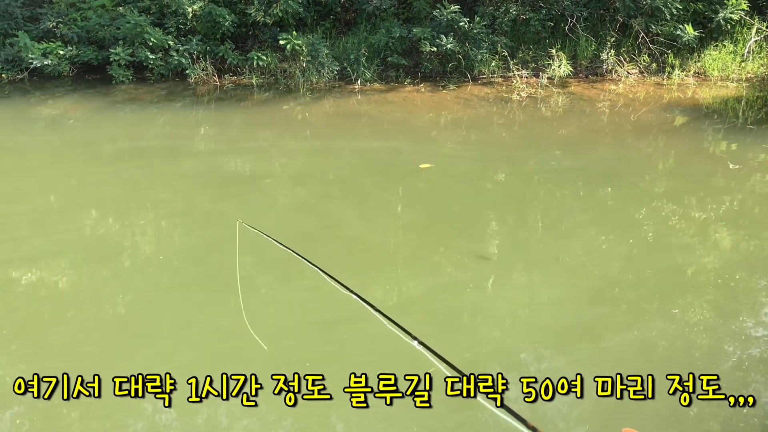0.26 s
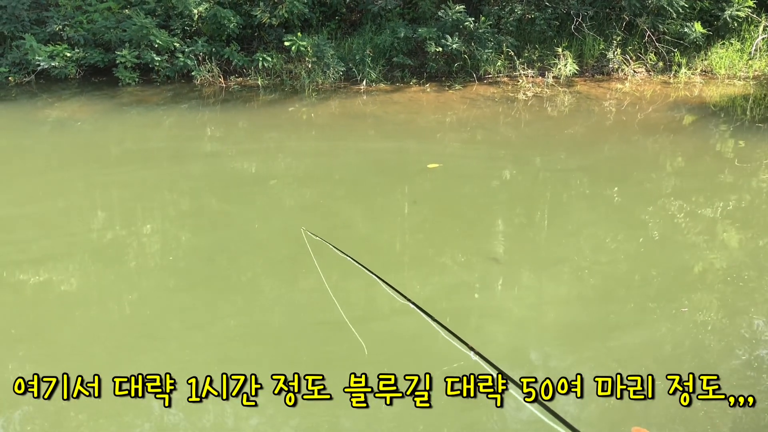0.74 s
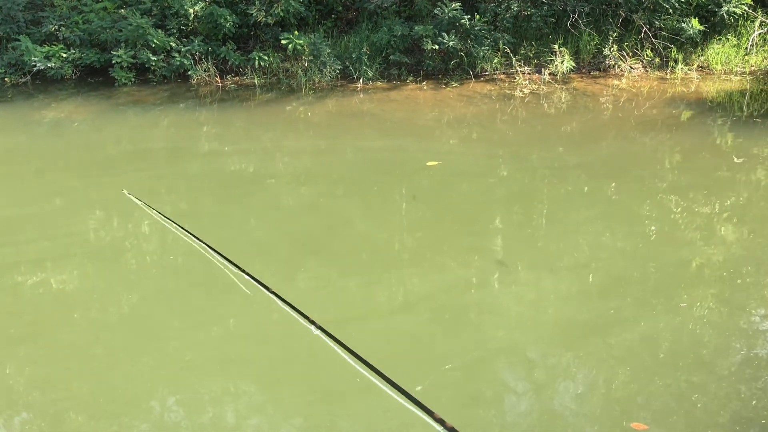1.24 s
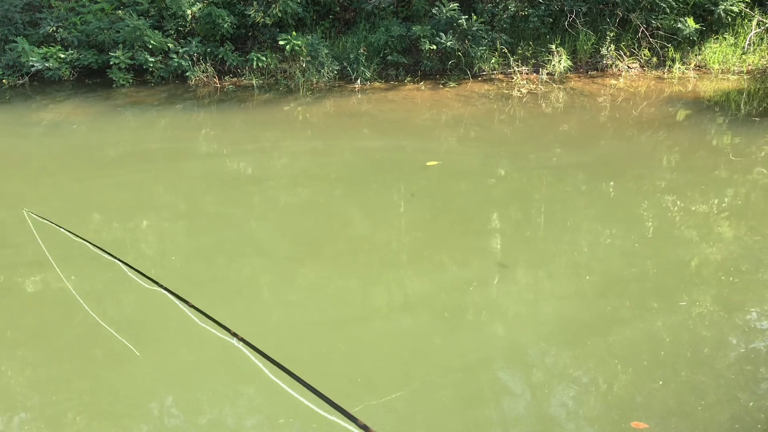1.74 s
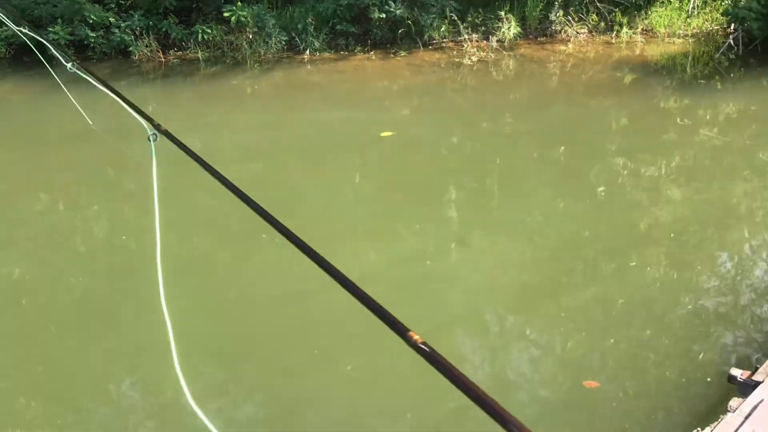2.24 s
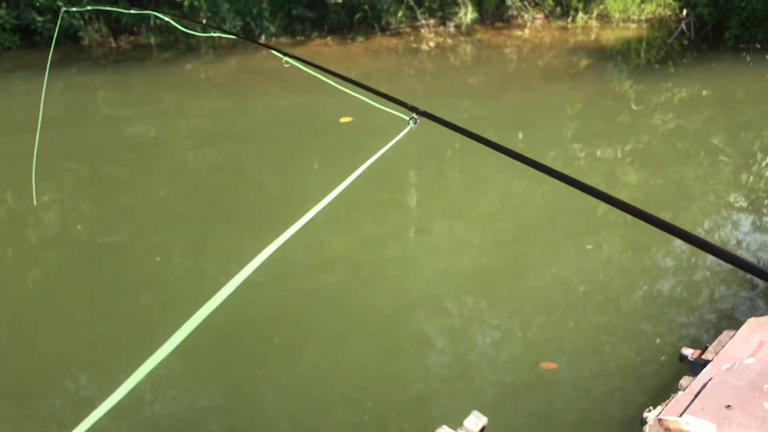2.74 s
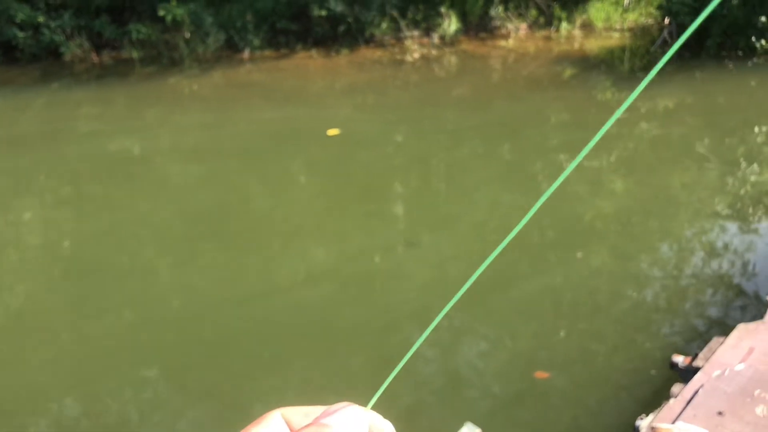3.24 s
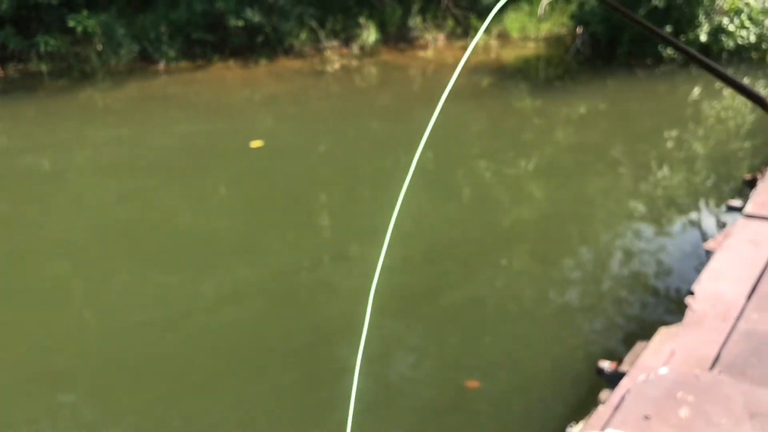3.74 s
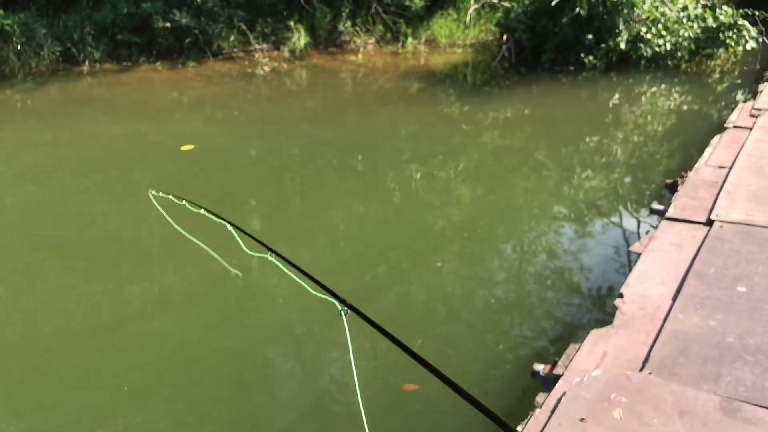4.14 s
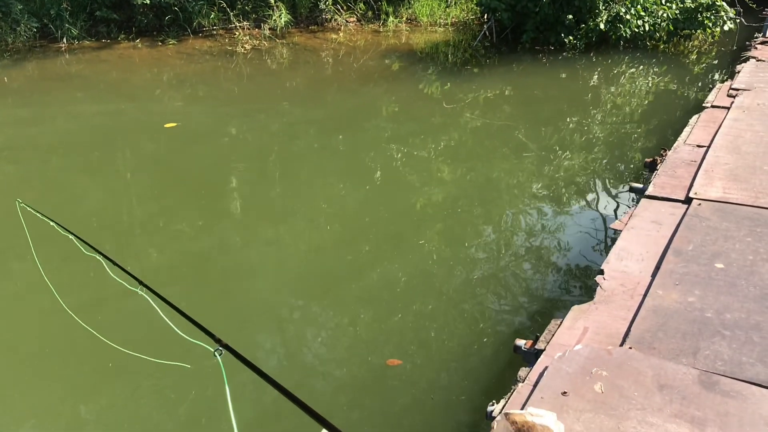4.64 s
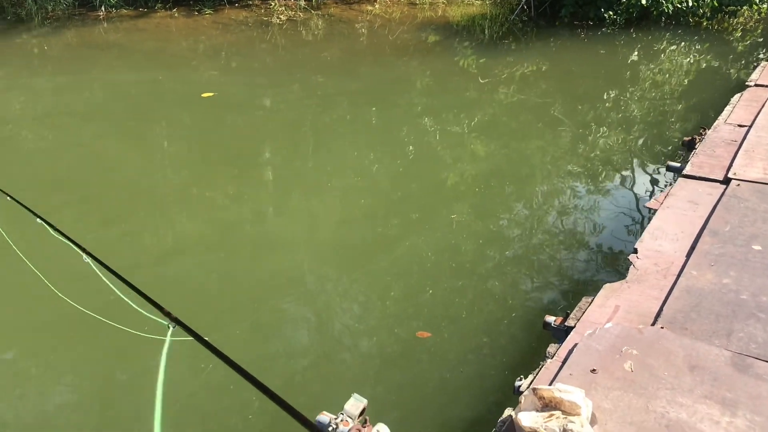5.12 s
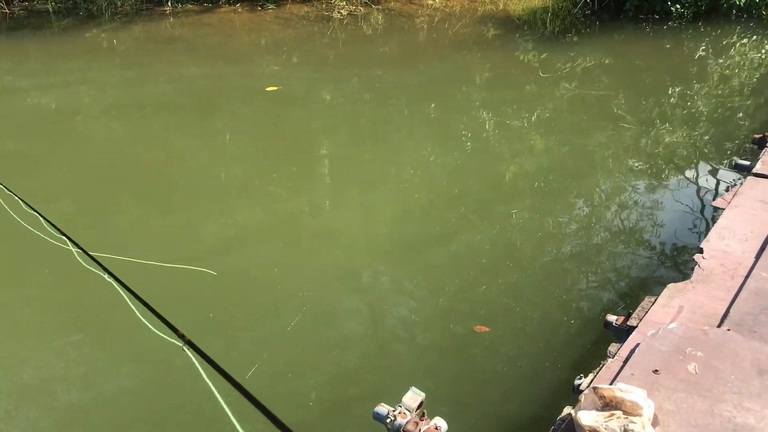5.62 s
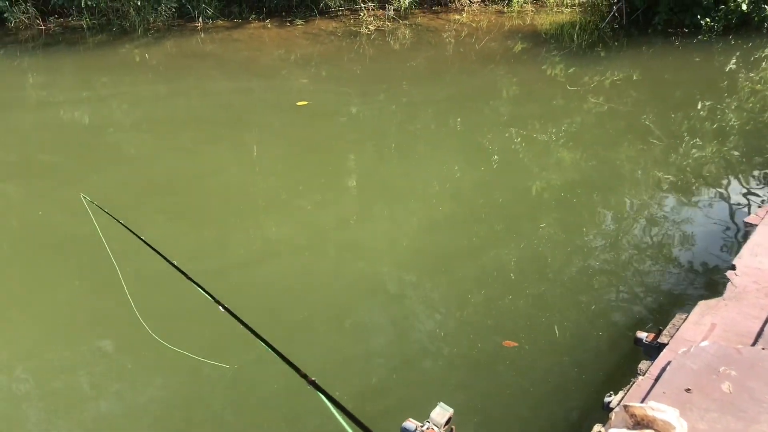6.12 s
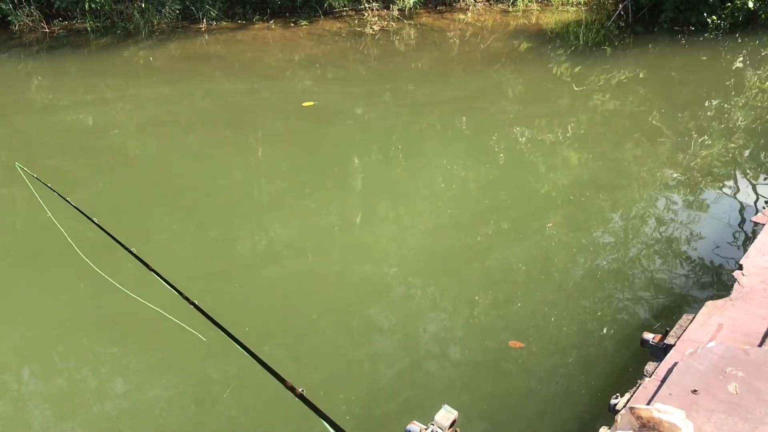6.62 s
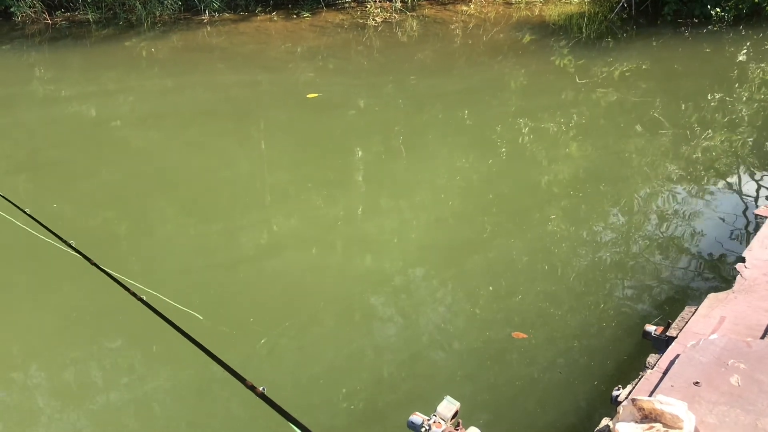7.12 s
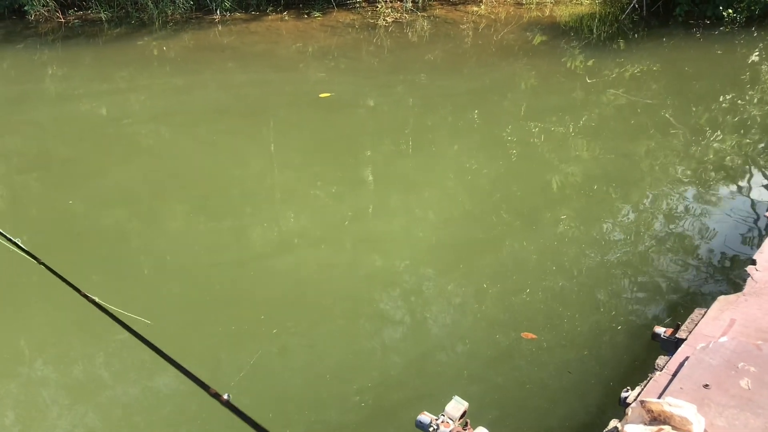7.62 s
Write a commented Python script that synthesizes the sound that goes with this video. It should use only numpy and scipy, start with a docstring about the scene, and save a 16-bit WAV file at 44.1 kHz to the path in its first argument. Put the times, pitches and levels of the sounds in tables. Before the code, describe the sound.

From the start, cicadas shrill in a dense, hissy high band, swelling over the first second and a half, then dipping, with a thinner insect drone below. Airy hiss and distant road rumble lie underneath; a vehicle's soft roar peaks near 2.5 s and fades by 3.4 s. Faint crickets chirp from 0.8 s, quickly repeated from 1.3 to 2 s. At 2.36 s a close click reel rattles loudly for 0.4 s, accelerating into a metallic whirr and slowing. Line scrapes from 2.7 s, with a busier cluster of rustles, flicks and knocks at 3.5-4.5 s. A second, shorter reel zip runs 4.77-5.04 s, followed by a hissy line slide at 5.15 s. Cicadas are strong from 5.3 to 6.9 s, with regular cricket chirps and tiny dull ticks. A distant bird gives a thin note at 6 s, then twitters falling whistles from about 6.9 s to the end at 7.9 s. Background level ducks after each pull, then recovers.

```python
"""Cicadas shrill in the trees by a pond, with a steady insect drone pitched below them, airy hiss and far
traffic: filtered noise bands. Crickets chirp in brief tones; then an angler twice strips line off a click
reel, whose pawl rattles over the gear, fastest in mid-pull: each tooth excites the resonances of the reel.
Line rustles, and small dull ticks fall, some of rod and line, those near 2 kHz perhaps water drips: bursts
of filtered noise. Late on a bird twitters in gliding sines.
The recorder turns its gain down for the loud reel and brings it back."""
import sys
import numpy as np
from scipy import signal
from scipy.fft import rfft, irfft, next_fast_len
from scipy.io import wavfile
from scipy.ndimage import uniform_filter1d, minimum_filter1d

SR = 44100
rng = np.random.default_rng(int(sys.argv[2]) if len(sys.argv) > 2 else 0)


def unload_wav(signal):
    """Save mono or channel-first audio to the path in sys.argv[1] as 16-bit WAV at rate SR, clipped to [-1, 1]."""
    wavfile.write(
        sys.argv[1],
        SR,
        np.round(np.clip(np.atleast_2d(signal).T, -1, 1) * 32767).astype(np.int16),
    )


N = 347067  # length of the scene [samples]


def amp(db):
    """Decibel law: 20 dB is a factor of ten in amplitude."""
    return 10 ** (np.asarray(db) / 20)


def noise():
    """White noise: equal power at every frequency, for the whole scene."""
    return rng.standard_normal(N)


def evened(x):
    """Normalisation to an rms of 1."""
    return x / np.sqrt(np.mean(x ** 2) + 1e-20)


def add(mix, s, sound):
    """Superposition: adds a sound to the mix from time s."""
    part = mix[round(s * SR):][:len(sound)]
    part += sound[:len(part)]


def shaped(x, points):
    """Spectral filtering: weights x by a (frequency [Hz], gain [dB]) curve, interpolated in log frequency."""
    size = next_fast_len(len(x))
    f, db = np.transpose(points)
    hz = np.arange(size // 2 + 1) * SR / size + 1
    gain = amp(np.interp(np.log(hz), np.log(f), db, -100, -100))
    return irfft(rfft(x, size) * gain, size)[:len(x)]


def ring(x, hz, width):
    """Resonance by heterodyning: shift hz, fixed or moving, down to zero, smooth, shift back."""
    turn = np.exp(2j * np.pi * np.cumsum(hz * np.ones(x.shape[-1])) / SR)
    r = np.exp(-np.pi * abs(width) / SR)
    return 2 * (turn * signal.lfilter([1 - r], [1, -r], x / turn)).real


def ring_twice(x, hz, width):
    """Cascaded resonances: two equal ones in series give steeper skirts."""
    return ring(ring(x, hz, width), hz, width)


def drift(per_s):
    """Slow random modulation: smoothed chance values, three per_s of them a second, about 1 rms."""
    knots = evened(uniform_filter1d(rng.standard_normal(4000), 3))
    return np.interp(np.arange(N) / SR * per_s * 3 % 3999, np.arange(4000), knots)


def curve(rows):
    """Linear interpolation of each column of a table over its first column, time [s]."""
    s, *columns = np.transpose(rows)
    return [np.interp(np.arange(N) / SR, s, c) for c in columns]


def blurred(x, wet_db, t60):
    """Multiple scattering from the trees: a decaying noise tail smears a far sound."""
    t = np.arange(6000) / SR
    tail = amp(-60 * t / t60) * rng.standard_normal(6000)
    return x + amp(wet_db) * signal.oaconvolve(x, tail / np.linalg.norm(tail))[:N]


# the chorus of cicadas swelling: (time [s], level [dB])
CHORUS = [(0, -51.5), (.9, -48.5), (1.48, -48.5), (1.58, -54), (1.75, -51), (2.3, -53), (2.95, -52),
          (3.43, -56), (3.6, -51.5), (4.7, -53), (5.3, -48.5), (5.4, -47.5), (6.9, -49), (7.25, -53),
          (7.55, -49.5), (7.87, -49.5)]
# singers: (body resonance [Hz], width of each of its two filters [Hz], relative level [dB],
#           tymbal click rate [per s])
CICADAS = [(6170, 170, -15, 480), (7210, 900, -14, 110), (7420, 460, -2, 160), (7980, 650, -5.5, 300),
           (8110, 190, -5, 230), (8520, 960, -3.5, 280), (9130, 850, -12.5, 310), (9260, 620, -30, 210),
           (11100, 490, -16, 190), (14900, 900, -23, 245)]
# the steady insect drone, pitched below the cicadas: (time [s], level [dB])
INSECT_DRONE = [(0, -66), (1.5, -71), (1.75, -63), (2.1, -64), (2.3, -67), (3.3, -66), (3.6, -62),
                (4.6, -65.5), (5.3, -62), (5.6, -69), (6.05, -61), (6.2, -73), (6.6, -70), (6.95, -61.5),
                (7.3, -73), (7.6, -70), (7.8, -62)]


def cicadas():
    """Forced resonance: noise pulsing at tymbal rate drives each cicada's body; a noise band drones below."""
    t, chorus = np.arange(N) / SR, 0
    for hz, width, db, per_s in CICADAS:
        # distance blurs the clicks: the pulsing is only 10 % deep
        clicks = 1 + 0.1 * np.cos(2 * np.pi * (per_s * t + 1.55 * drift(2.0)))
        song = evened(ring_twice(clicks * noise(), hz, width))
        chorus += amp(db + 3.0 * drift(4.2)) * song
    insect_drone = evened(ring_twice(noise(), 4640, 430))
    chorus_db, = curve(CHORUS)
    drone_db, = curve(INSECT_DRONE)
    return amp(chorus_db) * evened(chorus) + amp(drone_db + 1.2 * drift(30.)) * insect_drone


# spectrum of the low rumble: (frequency [Hz], relative level [dB])
RUMBLE = [(18, -64), (28, -48), (35, -18), (45, 4), (62, -3), (100, -3.5), (134, -6), (204, -5),
          (289, -11.5), (404, -13), (516, -22), (700, -19.5), (1000, -28)]
# spectrum of the tyre roar: (frequency [Hz], relative level [dB])
ROAR = [(300, -29), (550, -5), (950, 2), (1300, -1.5), (2000, -14), (3000, -18.5), (4500, -18.5),
        (7000, -41)]
# the road fading: (time [s], rumble level [dB], tyre roar level [dB])
ROAD = [(0, -40, -50), (.4, -45.5, -49), (2.3, -44.5, -50.5), (3.0, -46, -52), (3.7, -49, -56.5),
        (5.3, -51, -59.5), (6.1, -51.5, -59), (7.2, -53, -61.5), (7.87, -51.5, -60)]
# one vehicle going by: (time [s], centre of its roar [Hz], roar level [dB], tyre hiss level [dB])
PASSING = [(0, 1006, -52.5, -52), (.5, 980, -49.5, -52.5), (1.1, 1017, -56, -54.5), (1.7, 947, -54, -61.5),
           (2.25, 853, -49.5, -65), (2.5, 951, -45.5, -58), (2.9, 1110, -51, -74), (3.4, 1101, -65.5, -76),
           (7.87, 1050, -89, -80)]


def traffic():
    """Broadband road noise: low rumble, distant roar, and one vehicle whose colour drifts as it passes."""
    rumble_db, roar_db = curve(ROAD)
    rumble = evened(shaped(noise(), RUMBLE)) * amp(rumble_db + .5 * drift(6.0))
    roar = evened(shaped(noise(), ROAR)) * amp(roar_db + .5 * drift(8.0))
    hz, passing_db, tyres_db = curve(PASSING)
    # quadrature modulation lifts slow noise into a band around the moving hz
    slow = ring_twice(rng.standard_normal((2, N)), 0, 300)
    phase = 2 * np.pi * np.cumsum(hz) / SR
    passing = evened(slow[0] * np.cos(phase) + slow[1] * np.sin(phase)) * amp(passing_db)
    tyres = evened(ring_twice(noise(), 1570, 1150)) * amp(tyres_db)
    return rumble + roar + passing + tyres


# spectrum of the outdoor hiss: (frequency [Hz], relative level [dB])
AIR = [(180, -36), (300, -4), (502, -9), (1100, -14.5), (1480, -20.5), (2000, -11), (3240, -28),
       (5080, -11.5), (5610, -18.5), (7200, -1.5), (8360, 1), (10200, -12.5), (12900, -22.5), (15200, -24),
       (16000, -28)]
AIR_DB = -48  # rms level


def air():
    """Stationary noise: a steady outdoor hiss of fixed spectrum."""
    return amp(AIR_DB) * evened(shaped(noise(), AIR))


# line sliding through hand and rings:
# (time [s], length [s], scrape level [dB], hiss level [dB], fine treble level [dB]), levels at the start
STROKES = [(2.74, .36, -59.5, -60, -61), (3.493, 0.51, -56, -59, -58), (3.69, 0.2, -81, -54, -71),
           (3.875, 0.66, -58.5, -66, -68), (4.205, .25, -67, -64, -75), (5.153, .29, -62.5, -52.5, -65),
           (5.9, 0.23, -65, -76, -80)]
# how each stroke fades: (scrape, hiss, fine treble [dB per s])
STROKE_FADE_DB_PER_S = (-12, -30, -31)
STROKE_EDGE_S, IDLE_DB = 0.034, -66  # soft start and end; faint scrape that never stops


def sliding():
    """Friction envelopes of scrape, hiss and treble: each stroke starts softly, fades and lets go."""
    t, gain = np.arange(N) / SR, np.zeros((3, N))
    fade = np.c_[list(STROKE_FADE_DB_PER_S)]
    for s, length, *levels_db in STROKES:
        edge = np.clip(np.minimum(t - s, s + length - t) / STROKE_EDGE_S, 0, 1)
        gain += edge * amp(np.c_[levels_db] + fade * np.clip(t - s, 0, length))
    return gain + np.c_[[amp(IDLE_DB), 0, 0]]


# spectrum of the scrape: (frequency [Hz], relative level [dB])
SLIDE = [(1000, 6), (2000, -10), (3000, 1.5), (4500, -2), (6000, 1), (9000, -15), (12000, -14),
         (16000, -25)]
# small dull ticks, some of rod and line, those near 2 kHz perhaps water drips:
# (time [s], peak level [dB], centre [Hz], width of the last filter [Hz])
TICKS = [(2.2084, -39.5, 1970, 500), (3.577, -35.5, 1600, 2200), (3.6044, -42, 2800, 1500),
         (3.617, -35, 3240, 2000), (3.645, -34.5, 2950, 1800), (3.8173, -37.5, 2980, 1790),
         (3.9035, -39, 4300, 900), (3.912, -38.5, 2900, 900), (3.94, -37.5, 2900, 700),
         (4.4019, -38.5, 1270, 500), (4.762, -47, 4950, 1200), (5.084, -38, 4000, 6000),
         (5.573, -47, 2020, 605), (5.73, -52, 1970, 500), (5.752, -49, 2020, 603), (6.035, -49, 3020, 1200),
         (6.146, -45, 1240, 400), (6.225, -52, 2020, 500), (6.311, -54, 2150, 500), (6.52, -52, 1940, 500),
         (6.5694, -47.5, 2300, 900), (6.665, -51, 1850, 500), (6.8135, -53, 2500, 600),
         (6.8596, -47, 1100, 400), (6.874, -48, 1950, 500), (6.9, -53, 2000, 503), (7.471, -48, 1910, 600),
         (7.7644, -51, 1900, 500), (7.8496, -51, 2200, 700)]
# bright flicks of line: (time [s], peak level [dB])
FLICKS = [(2.9094, -47), (3.0694, -46), (3.6162, -36), (3.6436, -35), (3.8157, -36), (3.822, -40),
          (3.904, -35), (3.912, -39), (4.4608, -43), (4.5024, -44), (4.6982, -45), (5.1761, -40)]


def rustles_and_ticks():
    """Friction and impact: grainy sliding noise, with dull ticks and bright flicks as decaying bursts."""
    grain = noise() * amp(2.2 * drift(120.))
    scrape, hiss, treble = sliding()
    out = evened(shaped(grain, SLIDE)) * scrape
    out += evened(ring_twice(noise(), 5700, 1800)) * hiss * amp(2.0 * drift(70.))
    out += evened(ring_twice(grain, 13000, 5000)) * treble
    t = np.arange(800) / SR
    for s, db, hz, width in TICKS:
        tone_and_noise = np.cos(2 * np.pi * hz * t) + 3.2 * rng.standard_normal(800)
        knock = tone_and_noise * np.exp(-t / 0.0036)
        tick = ring(ring(knock, hz, 2 * width), hz, width)
        add(out, s, amp(db) * tick / abs(tick).max())
    for s, db in FLICKS:
        flick = np.diff(rng.standard_normal(801)) * np.exp(-t / .0012)  # differencing brightens the noise
        add(out, s, amp(db) * flick / abs(flick).max())
    return out


# cricket bouts: (time [s], chirps, time from chirp to chirp [s], wing strokes a chirp, relative level [dB])
BOUTS = [(.79, 1, 0, 4, -60), (1.035, 1, 0, 4, -55), (1.309, 6, .1372, 4, -56), (2.27, 1, 0, 4, -57),
         (3.1, 1, 0, 5, -60), (4.3, 2, .3, 5, -60), (5.378, 9, .277, 6, -57)]


def crickets():
    """Stridulation: wing strokes at an even 43 per s, each a brief tone that sags in pitch."""
    out, t = np.zeros(N), np.arange(600) / SR
    chirps = [(s + k * gap, strokes, db) for s, count, gap, strokes, db in BOUTS for k in range(count)]
    for s, count, db in chirps:
        chances = rng.standard_normal((8, 2))[:int(count)]
        for k, (pitch, loudness) in enumerate(chances):
            start_hz = 5370 + 40 * pitch
            stroke = np.sin(2 * np.pi * start_hz * t * (1 - 2.0 * t)) * np.hanning(600)
            add(out, s - .007 + k / 43, amp(db + 1.2 * loudness) * stroke)
    return blurred(out, -9, .1)


# modes of the reel, one list a part: handle, frame, foot, spool, pawl spring, rim, cage, and one that
# rings evenly; in each: (frequency [Hz], least width [Hz], relative level [dB])
REEL = [
    [(1740, 2300, 3)],
    [(2566, 120, 5.5)],
    [(3040, 42, 8.5), (3200, 73, -3)],
    [(4000, 150, 4.5), (4440, 75, 3.5)],
    [(4920, 175, 9), (5060, 240, 5.5)],
    [(11040, 360, 6)],
    [(11940, 190, 5), (12940, 140, 0), (14700, 160, -0.5), (14160, 360, -3), (15700, 120, -3)],
    [(6530, 660, -13), (6480, 400, -7.5), (7700, 100, -10), (8200, 120, -13), (8960, 80, 0)],
]
# spectrum of the pawl's broad snap: (frequency [Hz], relative level [dB])
SNAP = [(700, -43), (1000, -34), (1830, -9), (2570, 2.5), (3700, -17), (4500, -5), (5700, -3.5), (7000, -6),
        (10100, -16), (11400, -6.5), (15100, 0), (16200, -7)]
# how the first seven parts swell as the spool turns and drift as the reel tilts:
# (swell once a turn [dB], its loudest tooth, swell twice a turn [dB], its loudest tooth, drift [dB per turn])
PARTS = [(1.5, 16, 0.5, 13, -.6), (1.5, 32, 4.5, 21.7, .8), (3.5, 10.5, 1.5, 10, -1.5),
         (2.5, 27.6, 0.8, 6.1, 4), (1.5, 29, 3.5, 22.8, 2.5), (3.5, 7, 2, 13.5, -4.5),
         (1, 15, .6, 8.3, -2.5)]
TEETH_PER_TURN = 38.9
SPRING, LAST_RING_DB = 4, 8  # the pawl spring (its place in the lists) rings out when the spool stops


def sieve(x, order, hz, kind="low"):
    """Butterworth filtering: a maximally flat passband on one side of hz."""
    return signal.sosfilt(signal.butter(order, hz, kind, fs=SR, output="sos"), x)


def pull(speed, rattle, first_tooth, grip_db):
    """Modal excitation: each tooth slips, then strikes, and rings the reel's modes a little differently."""
    s, per_s = np.transpose(speed)
    clock = np.arange(s[0], s[-1], 1 / SR)
    passed = np.cumsum(np.interp(clock, s, per_s)) / SR
    count = round(passed[-1]) + 1
    # stretched a little so that a whole number of teeth goes by
    hits = np.interp(np.arange(count), passed * (count - 1) / passed[-1], clock)
    modes = [(part, *mode) for part, group in enumerate(REEL) for mode in group]
    chance = rng.standard_normal((count, len(modes) + 2))
    start, size = s[0] - .01, int((s[-1] - s[0] + .1) * SR)
    # the slip leads the strike by about a millisecond
    at = ((hits - start - .0011 + .000008 * chance[:, 0]) * SR).astype(int)

    tooth, step = first_tooth + np.arange(count), 2 * np.pi / TEETH_PER_TURN
    turned = np.arange(count) / TEETH_PER_TURN
    parts_db = []
    for db, (once_db, once, twice_db, twice, drift_db) in zip(grip_db, PARTS):
        swell_db = once_db * np.cos(step * (tooth - once)) + twice_db * np.cos(2 * step * (tooth - twice))
        parts_db.append(db + swell_db + drift_db * turned)
    parts_db.append(0)  # the last list of modes rings evenly
    parts_db[SPRING][-1] += LAST_RING_DB
    # a longer gap between teeth makes a slightly stronger strike, up to 14 ms
    gap_db = 1.34 * np.log10(np.minimum(np.gradient(hits), .014) / 0.004)
    size_db = np.interp(hits, *np.transpose(rattle)) + gap_db + 0.25 * chance[:, 1]

    t = np.arange(400) / SR
    slip = np.exp(-t / 0.0012)
    strike = np.exp(-((t - .0012) / 0.00048) ** 2)
    blow = slip + strike + 0.3 * (t > .0012) * np.exp(-(t - .0012) / 0.0024)
    habit = np.zeros(400)  # the clean part that every tooth repeats, heard as a whirr when the spool is fast
    habit[[2, 53]] = np.linalg.norm(blow) * np.array([.4, .9])

    def strikes(db, alike):
        """Periodic plus random excitation: alike sets the share that repeats from tooth to tooth."""
        train = np.zeros(size)
        train[at] = amp(db)
        fresh = signal.oaconvolve(train, blow)[:size] * rng.standard_normal(size)
        return alike * signal.oaconvolve(train, habit)[:size] + np.sqrt(1 - alike ** 2) * fresh

    clean = sieve(strikes(size_db, .85), 2, 4800)
    rough = sieve(strikes(size_db, .4), 2, 4800, "high")
    handle_top_hz = 2150  # only the handle sounds below this
    out = amp(9.0) * sieve(shaped(clean + rough, SNAP), 6, handle_top_hz, "high")
    for k, (part, hz, width, db) in enumerate(modes):
        # low modes repeat best, the loose handle less
        alike = np.clip(1.3 - hz / 9000, .2, .87) if part else .6
        drive = strikes(size_db + parts_db[part] + 2.0 * (1.3 - alike) * chance[:, k + 2], alike)
        # the grip shifts and bends the mode
        bend_hz = 70 * np.interp(np.arange(size), np.linspace(0, size, 9), rng.standard_normal(9))
        rung = amp(db + 17) * ring(drive, hz + bend_hz, max(width, 120 + hz / 40))
        out += rung if part == 0 else sieve(rung, 6, handle_top_hz, "high")
    return start, sieve(out, 4, 1200, "high")  # too small to radiate bass


# speed of the spool, one table a pull: (time [s], gear teeth [per s])
SPEED = [
    [(2.3564, 86.1), (2.39, 92.2), (2.43, 173.5), (2.49, 244.8), (2.53, 273.6), (2.575, 307.5), (2.63, 288),
     (2.68, 214.2), (2.72, 137.4), (2.7586, 56.3)],
    [(4.7739, 69.8), (4.81, 112.3), (4.85, 199.6), (4.89, 257.4), (4.92, 225.3), (4.96, 160.3),
     (4.99, 97.2), (5.012, 58.6), (5.0394, 0)],
]
# rattle, one table a pull: (time [s], relative level [dB])
RATTLE = [
    [(2.357, -25), (2.43, -24.5), (2.49, -25.5), (2.585, -27.5), (2.67, -29.5), (2.72, -29.5), (2.76, -34)],
    [(4.775, -25), (4.855, -22), (4.933, -24), (5.013, -25.5), (5.04, -25.5)],
]
# where on the gear each pull starts: one [tooth] a pull
FIRST_TOOTH = [0.1, 31.8]
# how loud the parts ring in the grip of each pull, one row a pull:
# (handle, frame, foot, spool, pawl spring, rim, cage [dB])
GRIPS = [(-26, -14.5, -6, -10, -19.5, 2, 1), (-22, -12.5, -12, -12.5, -15.5, -7, -5)]


def reel():
    """Early reflections: both pulls, with an echo off the ground and a short scatter from the bank."""
    direct = np.zeros(N)
    for row in zip(SPEED, RATTLE, FIRST_TOOTH, GRIPS):
        add(direct, *pull(*row))
    t = np.arange(3000) / SR
    bank = amp(-32.5 - 60 * t / 0.06) * rng.standard_normal(3000) * (t > .002)
    ground = amp(-26) * np.exp(-((t - .0048) / 0.000065) ** 2) * rng.standard_normal(3000)
    return direct + signal.oaconvolve(direct, bank + ground)[:N]


# single notes: (time [s], nominal length [s], start [Hz], end [Hz], relative level [dB])
BIRD = [(6.005, 0.027, 4000, 3500, -58), (6.646, 0.031, 4000, 3320, -65), (6.917, 0.027, 3900, 3220, -59),
        (6.938, 0.024, 3380, 3550, -58), (7.182, .026, 3850, 4060, -63), (7.385, .026, 3850, 4300, -62),
        (7.408, 0.02, 3470, 3600, -60)]
# trills of like falling notes: (time [s], notes, time from note to note [s])
TRILLS = [(6.99, 8, .0725), (7.59, 4, .075)]
# the note they repeat: (nominal length [s], start [Hz], end [Hz], mean relative level [dB])
TRILL_NOTE = (.033, 4062, 3480, -63)


def bird():
    """Frequency modulation: thin whistles far off, each a sine gliding from one pitch to another."""
    out = np.zeros(N)
    *shape, mean_db = TRILL_NOTE
    notes = list(BIRD)
    for s, count, gap in TRILLS:
        notes += [(s + k * gap, *shape, mean_db + 2.5 * rng.standard_normal()) for k in range(count)]
    for s, length, start_hz, end_hz, db in notes:
        hz = np.linspace(start_hz, end_hz, int(1.17 * length * SR))  # room for the soft edges
        whistle = np.sin(2 * np.pi * np.cumsum(hz) / SR) * signal.windows.tukey(len(hz), .4)
        add(out, s - .004, amp(db) * whistle)
    return amp(-2) * blurred(out, -2, .12)


def scene():
    """Superposition: the sounds add linearly, in one channel."""
    return (cicadas() + traffic() + air() + rustles_and_ticks() + crickets() + reel() + bird())[None]


def record(dry):
    """Dynamic compression: gain ducks under loud sound, holds, recovers; then a treble shelf and band limit."""
    power_db = 10 * np.log10(abs(uniform_filter1d(dry[0] ** 2, size=900)) + 1e-12)
    over_db = np.clip(power_db + 29, 0, 14)
    held_db = -minimum_filter1d(-over_db, size=4001, origin=2000)  # greatest of the last 4001 samples
    gain_db = -.35 * signal.lfilter([.0006], [1, .0006 - 1], held_db)
    level = dry * amp(gain_db)
    shelf = signal.firwin(511, 15720, window=("kaiser", 6), fs=SR)
    shelved = amp(-26) * level + signal.oaconvolve(level, shelf[None], "same")
    band_limit = signal.firwin(511, 16900, window=("kaiser", 9), fs=SR)
    return signal.oaconvolve(shelved, band_limit[None], "same")


dry = scene()
out = record(dry)
unload_wav(out)
```